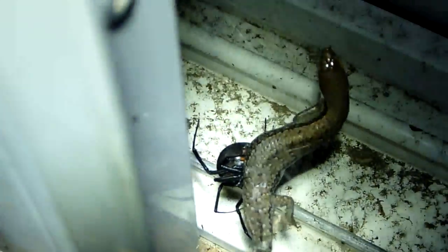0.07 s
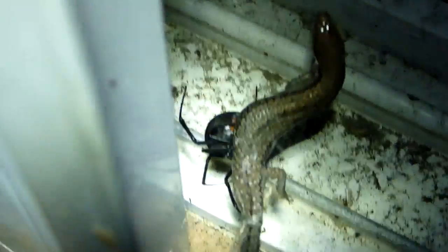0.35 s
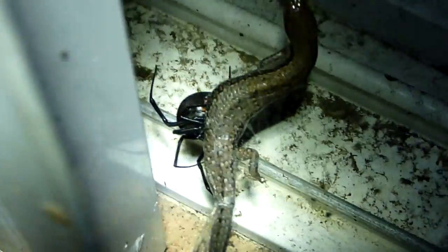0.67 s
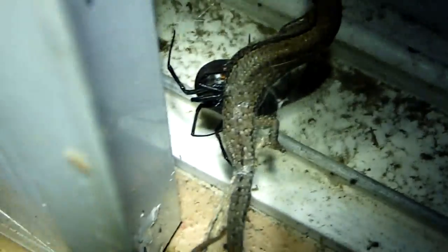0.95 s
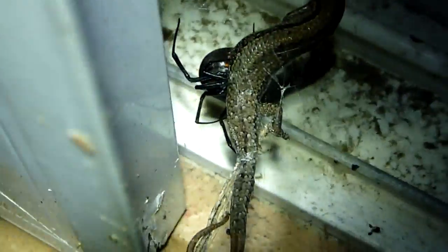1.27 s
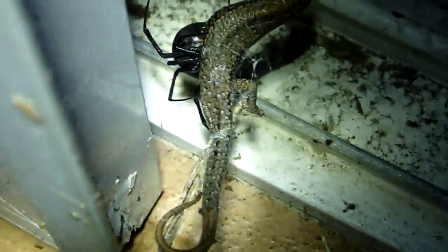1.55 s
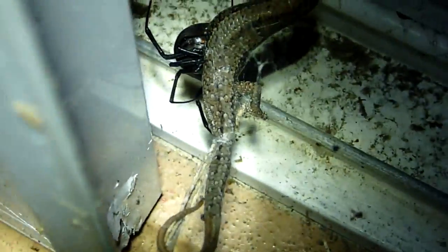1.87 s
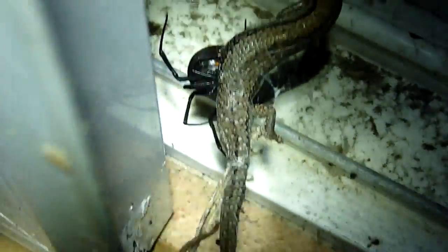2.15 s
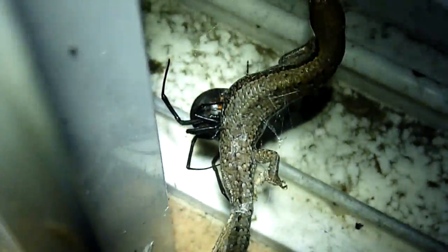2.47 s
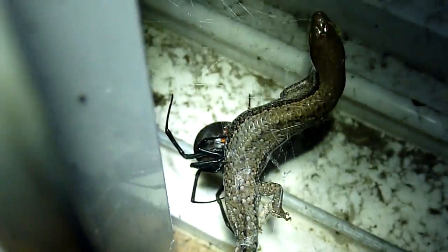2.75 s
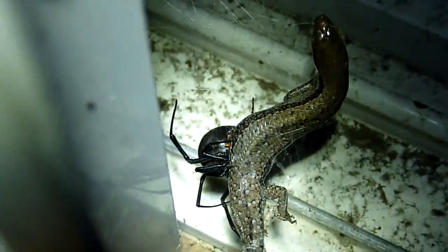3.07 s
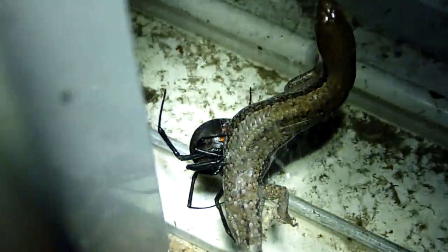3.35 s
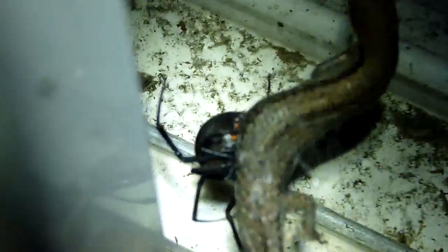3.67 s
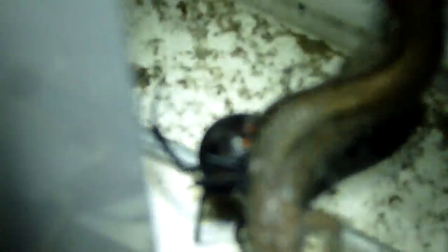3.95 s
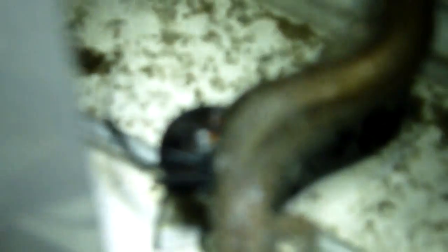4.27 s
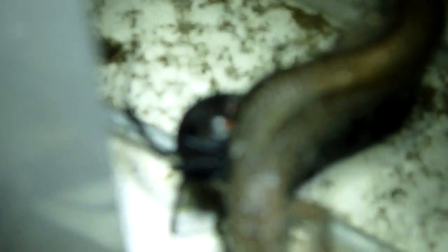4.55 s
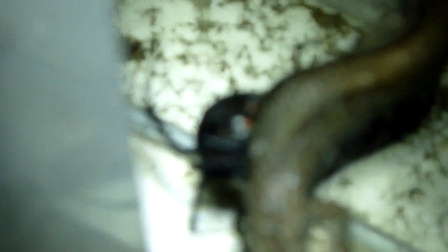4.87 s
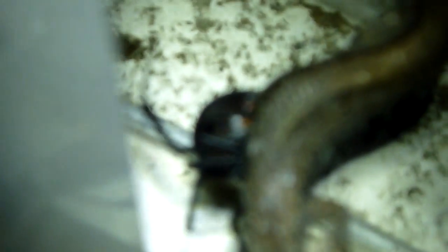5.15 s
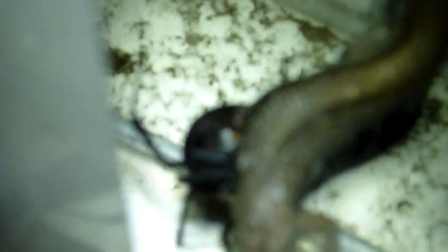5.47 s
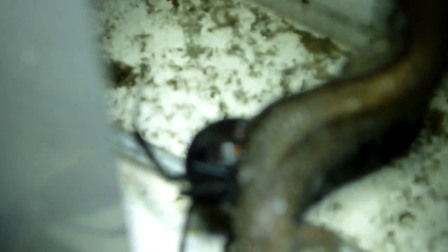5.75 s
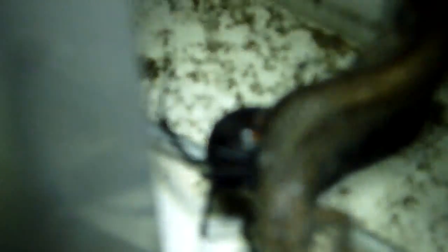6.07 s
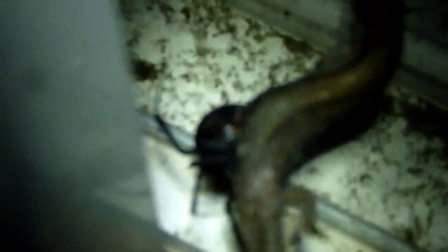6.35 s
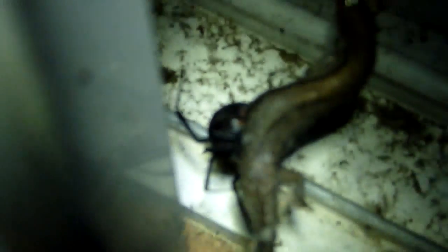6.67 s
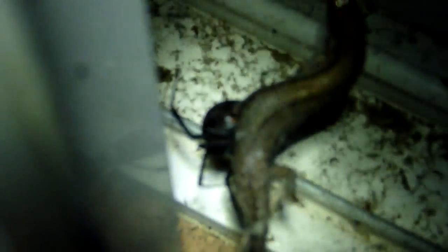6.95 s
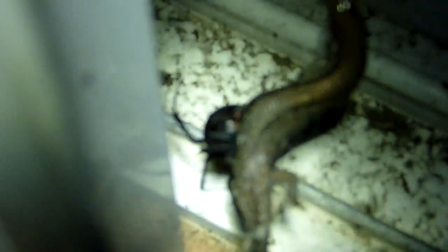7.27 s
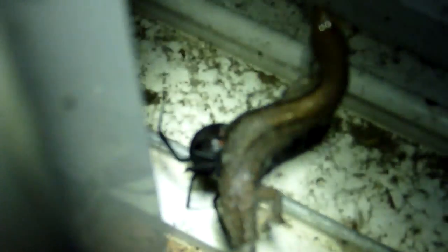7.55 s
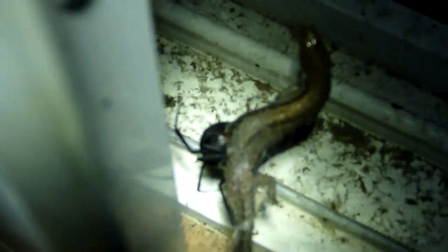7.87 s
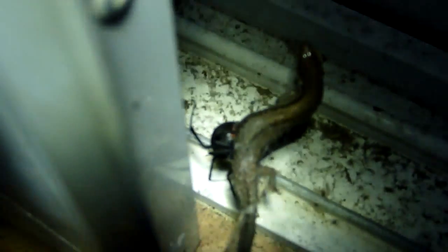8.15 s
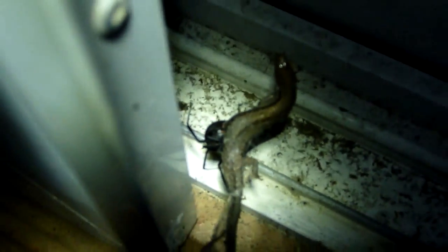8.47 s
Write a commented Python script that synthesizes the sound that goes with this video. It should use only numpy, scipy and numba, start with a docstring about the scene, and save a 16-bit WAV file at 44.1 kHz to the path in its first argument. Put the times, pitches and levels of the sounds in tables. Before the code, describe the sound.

A faint steady hiss and a distant, high chorus of crickets run throughout, outdoors at night, the crickets slowly receding. From about 2.1 seconds, fingers softly bump and tick on a small camera, right at the microphone. A sharp, loud click with a slight metallic ring comes at 3 seconds, followed by a soft bump. The lens motor whirs briefly and very faintly at 3.8, then a hard double click knocks the plastic body at 4.1. Another loud double click with a small rattle lands at 5.3, followed by a second faint, high whir until a lighter knock at 5.7 and a tiny ping at 5.9. The background dips after the hardest knocks and creeps back. Lighter ticks and finger bumps come around 6.3, between 6.8 and 7.5, and again near 8.3 seconds.

```python
"""Faint hiss and a far chorus of crickets, outdoors at night. Then, right at the microphone, a hand
works a small camera: fingers bump the case and the controls click and knock. Each blow ticks, thumps
the body, rings the plastic shell and one small metal part, and shakes loose pieces.
The lens motor whirs twice, close and quiet. The gain ducks after the hardest knocks and creeps back."""
import sys
import numpy as np
from scipy import signal
from scipy.fft import rfft, irfft
from scipy.io import wavfile
from numba import njit

SR = 44100
rng = np.random.default_rng(int(sys.argv[2]) if len(sys.argv) > 2 else 0)


def pcm_store(signal):
    """Save signal as 16-bit PCM."""
    levels = np.round(np.clip(np.atleast_2d(signal), -1, 1) * 32767)
    wavfile.write(sys.argv[1], SR, levels.astype(np.int16).T)


N = 384111
T = np.arange(int(1.2 * SR)) / SR  # time within one event [s]
TOP_HZ = 16000

# Clicks at the microphone: (time [s], metal part, part level [dB], part tilt [dB/octave], tick level [dB],
# tick pitch [Hz], thump level [dB], thump pitch [Hz], shell level [dB], rattle level [dB])
CONTROL_CLICKS = [ (2.5861, "lever", -36, 2, -16.5, 3260, -15.5, 265, -32.5, -27.5),
                  (2.6586, "catch", -63, 10, -36, 4040, -16.5, 170, -40, -25.5),
                  (2.961, "spring", -53, -3.5, 15.5, 6340, -2, 170, -33.5, -25),
                  (4.0573, "catch", -55.5, 5.5, 1, 3780, -1, 171, -28, -31),
                  (4.1091, "catch", -38, 3, 0, 5050, -8, 135, -38, -15.5),
                  (5.2710, "lever", -61, -8.5, -13, 4800, -7, 180, -41.5, -24.5),
                  (5.2723, "lever", -49.5, 12, 11, 5350, 3.5, 365, -27.5, -11.5),
                  (5.3123, "catch", -54, 3, 3.5, 3500, -50.5, 200, -15.5, -23),
                  (5.702, "spring", -39.5, 1.5, -30, 5020, -16, 150, -24, -20.5),
                  (6.3231, "catch", -56, 9.5, -16, 2000, -27, 222, -30, -24.5),
                  (7.3123, "spring", -51, 2.5, -14, 4900, -23.5, 210, -24.5, -31),
                  (8.3436, "catch", -50.5, 4.5, -10.5, 2540, -16, 428.6, -33.5, -26)]
# Modes of the plastic shell, three metal parts and a falling piece: (frequency [Hz], level [dB], t60 [s])
SHELL_MODES = [(1449, 3, 0.028), (2020, -6.5, 0.033), (3309, 4, 0.015), (5068, -3.5, 0.024),
               (6150, -9, 0.012), (7130, -10, 0.024), (9800, -17, 0.022), (10950, -3.5, 0.011)]
SPRING_MODES = [(1604.5, -1.5, 1.5), (1874, -17, 0.96), (3085, -9, .25), (5085, -7, .16),
                (5486, -10.5, .22), (6140, -2, .24), (6520, -9, 0.184), (6850, -12.5, .25), (7036, -5, 0.3),
                (7800, 1.5, 0.19), (8210, -3, .2), (8970, -10, 0.25), (9680, -9, .28), (10070, -11, 0.4),
                (12130, -22.5, 0.3), (12510, -16, .3)]
LEVER_MODES = [(1404, -1, 0.24), (3220, -8, 0.12), (5300, -11, 0.14), (6170, -13, 0.072), (7445, 0, 0.075),
               (9502, -15, 0.061), (10150, -18, 0.102)]
CATCH_MODES = [(2175, -1, 0.25), (2785, 8.5, 0.094), (3660, 0, 0.1), (4296, -18, 0.23), (5200, -10, 0.2),
               (5556, -6, .09), (6400, -4, 0.11), (7400, -20, .2), (9150, -24.5, 0.158),
               (10000, -15.5, 0.18), (11100, -44, 0.149), (12200, -25.5, 0.18)]
PING_MODES = [(2186, 2, 0.17), (4344, -6, 0.12), (5370, -5.5, 0.11), (7430, -10, .12)]
# Spectrum of the loose pieces, heard close: (frequency [Hz], level [dB])
RATTLE_SPECTRUM = [(150, -13.5), (400, 4.5), (900, -8), (2000, 1.5), (3500, -2.5), (6000, -1.5),
                   (8500, -11.5), (11000, -11), (13500, -21), (16000, -35.5)]


def controls(lead_db=-12, lead_s=0.0033, rattle_s=0.0031, pin_db=7.5, case_hz=3500, case_octaves=0.2):
    """Each click swells in with a brief, faint rustle, then snaps: parts ring, loose pieces chatter."""
    out, loose = np.zeros(N), np.zeros(N)
    shell = ring(SHELL_MODES)
    parts = {"spring": SPRING_MODES, "lever": LEVER_MODES, "catch": CATCH_MODES}
    for s, part, part_db, tilt_db, tick_db, hz, thump_db, thump_hz, shell_db, rattle_db in CONTROL_CLICKS:
        lead_in = chatter(lead_s, sharpness=5.4, scatter_db=-3)
        add(loose, s - lead_s, undb(rattle_db + lead_db) * lead_in)
        # contacts near the resonance of the case ring up to twice as long
        resonance = np.exp(-(np.log2(hz / case_hz) / case_octaves) ** 2)
        add(out, s, undb(tick_db) * tick(hz, cycles=5.4 * (1 + resonance)))
        add(out, s, undb(thump_db) * thump(thump_hz))
        add(out, s, undb(shell_db) * shell)
        add(out, s, undb(part_db) * ring(parts[part], tilt_db))
        # a hard tick pins the loose pieces: at pin_db they peak in half the time
        rise_s = rattle_s / (1 + undb(tick_db - pin_db) ** 2)
        add(loose, s, undb(rattle_db) * chatter(rise_s, sharpness=1.66, scatter_db=9))
    add(out, s=5.9, sound=undb(-47.5) * ring(PING_MODES))  # a small metal piece drops back and pings
    return out + colour(loose, RATTLE_SPECTRUM)


def tick(hz, cycles, edge_db=-7, edge_hz=10600, edge_t60=0.001, low_cut_ratio=0.26):
    """A hard contact: the struck spot swings a few times; small spots have a bright edge, little bass."""
    edge = undb(edge_db) * (hz / edge_hz) ** 2 * mode(edge_hz, edge_t60)
    snap = mode(hz, cycles / hz) - edge
    return signal.lfilter(*signal.butter(2, low_cut_ratio * hz, "high", fs=SR), snap)


def thump(hz, cycles=4.88, overtone_ratio=2.37, overtone_db=-5, wall_db=-12, low_cut_ratio=0.099):
    """The body jolts in the hand, which damps it within a few swings; the case wall knocks along."""
    overtone_hz = overtone_ratio * hz
    overtone = undb(overtone_db) * mode(overtone_hz, cycles / overtone_hz)
    wall = undb(wall_db) * mode(hz=520, t60=0.0111)
    jolt = mode(hz, cycles / hz) - overtone - wall
    return signal.lfilter(*signal.butter(1, low_cut_ratio * hz, "high", fs=SR), jolt)


def ring(modes, tilt_db=0, pivot_hz=2000):
    """All modes of one part, struck together; the spot where it is struck tilts them towards the treble or the
    bass."""
    return sum((-1) ** k * undb(db + tilt_db * np.log2(hz / pivot_hz)) * mode(hz, t60)
               for k, (hz, db, t60) in enumerate(modes))


def mode(hz, t60):
    """A struck resonance that falls 60 dB in t60 seconds."""
    t = T[:int(1.5 * t60 * SR) + 2]
    swing = np.sin(2 * np.pi * hz * t) * np.exp(-np.log(1000) * t / t60)
    return np.pad(swing, (0, len(T) - len(t)))


def chatter(rise_s, sharpness, scatter_db):
    """A swarm of tiny uneven contacts that peaks after rise_s and dies away."""
    age = T[:len(T) // 8] / rise_s
    grains = rng.standard_normal(len(age)) * undb(scatter_db * rng.standard_normal(len(age)))
    swell = (age * np.exp(1 - age)) ** sharpness
    swarm = grains * swell
    return swarm * np.sqrt(np.sum(swell ** 2) / np.sum(swarm ** 2))


# Soft bumps of the fingers on the body: (time [s], level [dB])
FINGER_BUMPS = [(2.148, -32.5), (2.262, -37.5), (2.4862, -32), (3.166, -19.5), (5.926, -27.5), (7.17, -36),
                (7.5247, -34), (8.2601, -36)]
# Light ticks of the grip: (time [s], level [dB], pitch [Hz])
GRIP_TICKS = [(2.133, -31, 1010), (2.148, -26, 910), (2.485, -14, 5200), (3.166, -38, 900),
              (6.292, -25, 1400), (6.304, -20, 1500), (6.776, -29, 1960), (7.106, -28.5, 2080),
              (7.1695, -24, 1900), (7.185, -26.5, 1040), (7.2945, -25.5, 2540), (8.2606, -12.5, 3160),
              (8.268, -20, 1430)]
# Skin slipping on the shell: (time [s], level [dB], rise [s])
SKIN_SLIPS = [(5.153, -47, 0.009), (6.383, -45.5, 0.0076), (7.134, -50, 0.02), (7.162, -38.5, 0.0058)]
# Spectrum of those slips: (frequency [Hz], level [dB])
SLIP_SPECTRUM = [(400, -16), (1800, 7.5), (3000, -2), (6000, -5), (11000, -19.5), (15000, -33)]


def grip():
    """Handling noise beside the microphone: fingers bump, tick and slip on the case."""
    out, slips = np.zeros(N), np.zeros(N)
    for s, db in FINGER_BUMPS:
        add(out, s, undb(db) * thump(hz=243, cycles=4.2, overtone_db=-17, wall_db=-26))
    for s, db, hz in GRIP_TICKS:
        add(out, s, undb(db) * tick(hz, cycles=4.5, edge_db=-20))
    for s, db, rise_s in SKIN_SLIPS:
        add(slips, s, undb(db) * chatter(rise_s, sharpness=1, scatter_db=11.5))
    return out + colour(slips, SLIP_SPECTRUM)


# Moves of the lens motor: (start [s], end [s], level [dB])
LENS_RUNS = [(3.81, 3.961, -62), (5.352, 5.722, -64.5)]
# Spectrum of the tiny lens mount: (frequency [Hz], level [dB])
MOUNT_SPECTRUM = [(3000, -44), (7000, -11.5), (8700, -0.5), (11600, 0), (13000, -10.5), (14500, -6.5),
                  (15200, -31.5)]


def lens_motor(step_hz=362.8, uneven_db=2, rub_db=-6, ramp_s=0.0065):
    """Close and faint, even motor steps buzz in a mount that passes only treble; the slide rubs along."""
    out, t = np.zeros(N), T[:len(T) // 2]
    steps = sum(undb(uneven_db * rng.standard_normal()) * np.sin(2 * np.pi * (hz * t + rng.random()))
                for hz in np.arange(step_hz, TOP_HZ, step_hz))
    rub = undb(rub_db) * rng.standard_normal(len(t))
    whir = colour(steps / steps.std() + rub, MOUNT_SPECTRUM)
    for start, end, db in LENS_RUNS:
        gate = np.clip(np.minimum(t, end - start - t) / ramp_s, 0, 1)
        add(out, start, undb(db) * gate * whir / whir.std())
    return out


def crickets(strokes=380, hz=5120, spread_hz=110, sag_hz=130, base_db=-66, fade_db_per_s=-0.21):
    """Far from the microphone, a slowly receding chorus: short wing strokes, each sagging in pitch."""
    out = np.zeros(N)
    progress = np.linspace(0, 1, int(.048 * SR))  # through one 48 ms stroke
    for (when, nearness), detune in zip(rng.random((strokes, 2)), rng.standard_normal(strokes)):
        s = when * N / SR
        phase = 2 * np.pi * np.cumsum(hz + spread_hz * detune - sag_hz * (progress - .5)) / SR
        gain = undb(base_db + fade_db_per_s * s) * (.5 + 1.5 * nearness ** 3)
        add(out, s, gain * np.sin(np.pi * progress) * np.sin(phase))
    return out


# Spectrum of the night air and the microphone's own hiss: (frequency [Hz], level [dB])
AIR_SPECTRUM = [(25, -0.5), (60, -5.5), (130, -0.5), (350, 1.5), (700, -1.5), (1400, -5.5), (2800, -9.5),
                (5000, -13), (7000, -17.5), (10300, -21), (12500, -25), (14500, -30), (16000, -29)]
# Stretches in which the hiss loses a narrow low band: (start [s], end [s])
HOLLOW_SPANS = [(3.2, 4.4), (5.901, 5.9), (7.55, 8.7)]


def hiss(air_db=-54, hollow_hz=251, hollow_q=2.1, ramp_s=0.091, whine_hz=15625, whine_db=-76):
    """Still night air and microphone hiss, at times a little hollow, with a thin electronic whine."""
    t = np.arange(N) / SR
    whine = undb(whine_db) * np.sin(2 * np.pi * whine_hz * t)
    air = undb(air_db) * colour(rng.standard_normal(N), AIR_SPECTRUM)
    hollow = signal.lfilter(*signal.iirnotch(hollow_hz, hollow_q, fs=SR), air)
    share = sum(np.clip(np.minimum(t - start, end - t) / ramp_s, 0, 1) for start, end in HOLLOW_SPANS)
    return air + share * (hollow - air) + whine


def undb(db):
    """Decibels to gain."""
    return 10 ** (np.asarray(db) / 20)


def add(track, s, sound):
    """Mix a sound into the track at s seconds."""
    i = int(s * SR)
    track[i:i + len(sound)] += sound[:N - i]


def colour(x, spectrum):
    """Shape a sound by a smooth spectrum; white noise keeps its power."""
    hz, db = np.transpose(spectrum)
    bin_hz = np.arange(len(x) // 2 + 1) * SR / len(x)
    gain = undb(np.interp(np.log(bin_hz + 1), np.log(hz), db))
    return irfft(rfft(x) * gain / np.sqrt(np.mean(gain ** 2)), len(x))


@njit
def gain_control(x, threshold, attack_s, recovery_db_per_s):
    """The gain sinks while the sound exceeds the threshold, then creeps back."""
    y, cut_db = np.empty(len(x)), 0.
    for i in range(len(x)):
        y[i] = x[i] * 10 ** (-cut_db / 20)
        if abs(y[i]) > threshold:
            cut_db += 20 * np.log10(abs(y[i]) / threshold) / (attack_s * SR)
        cut_db = max(cut_db - recovery_db_per_s / SR, 0.)
    return y


def scene():
    """The handled camera up close, the quiet night far behind it, in mono."""
    return (controls() + grip() + lens_motor() + crickets() + hiss())[None]


def record(dry, notch_hz=7950, notch_q=5, band_hz=(65, 12800), threshold_db=-13):
    """The microphone port cancels a narrow treble band; hard knocks overload it and duck the gain."""
    x = signal.lfilter(*signal.iirnotch(notch_hz, notch_q, fs=SR), dry[0])
    x = signal.lfilter(*signal.butter(2, band_hz, "band", fs=SR), x)
    ducked = gain_control(x, float(undb(threshold_db)), attack_s=0.0026, recovery_db_per_s=2.5)
    treble_cut = signal.ellip(8, .2, 70, TOP_HZ, fs=SR, output="sos")
    return signal.sosfilt(treble_cut, np.clip(ducked, -1, 1))[None]


dry = scene()
out = record(dry)
pcm_store(out)
```